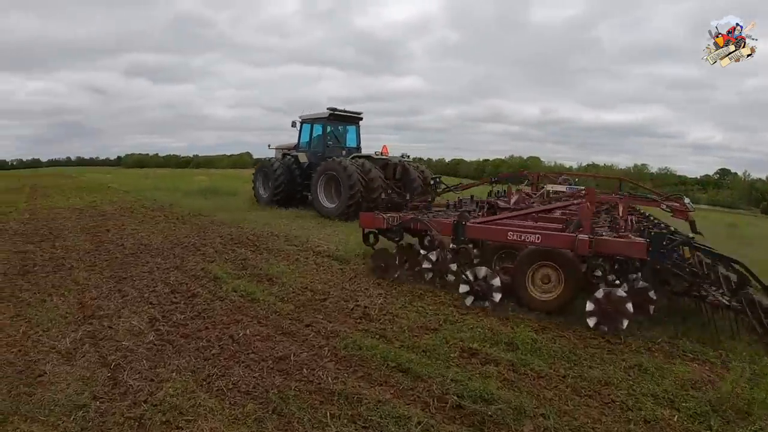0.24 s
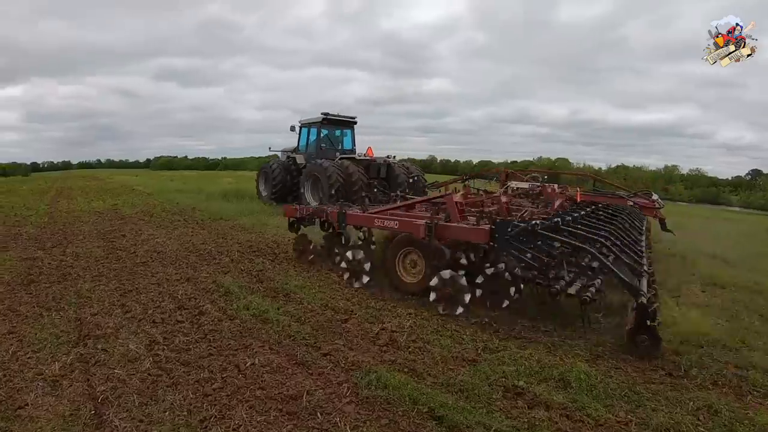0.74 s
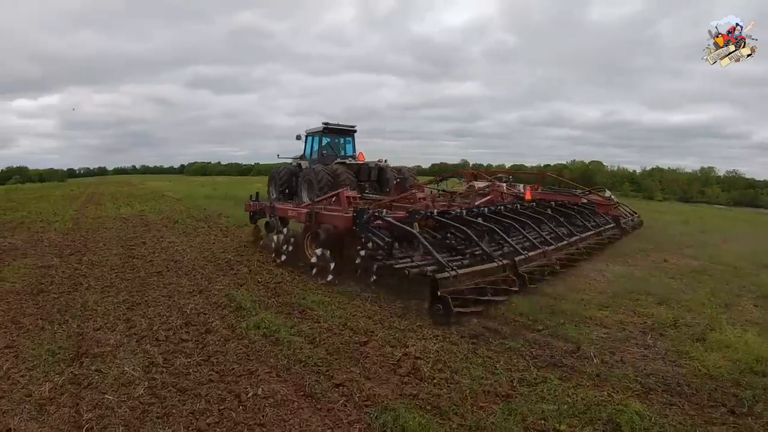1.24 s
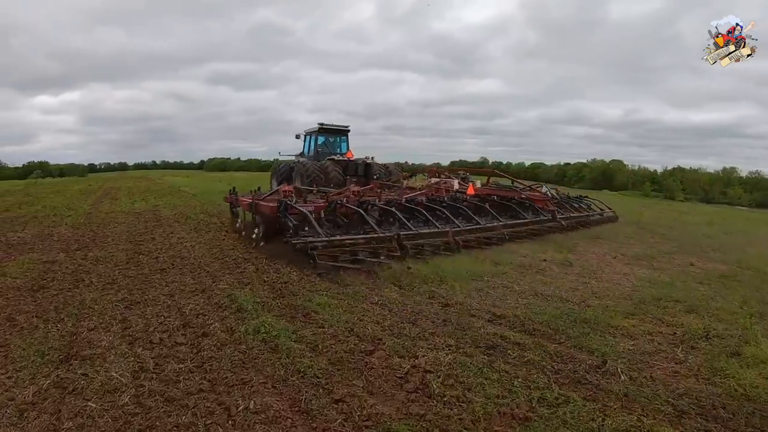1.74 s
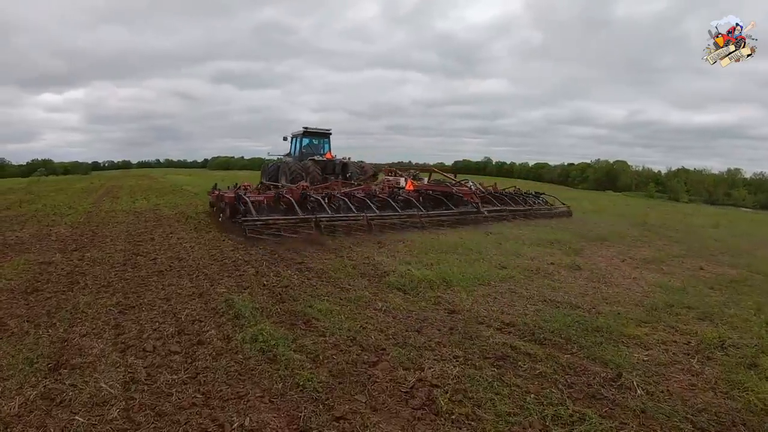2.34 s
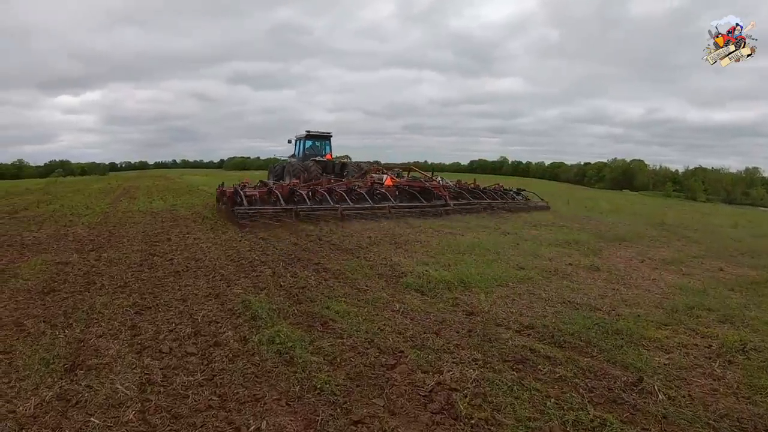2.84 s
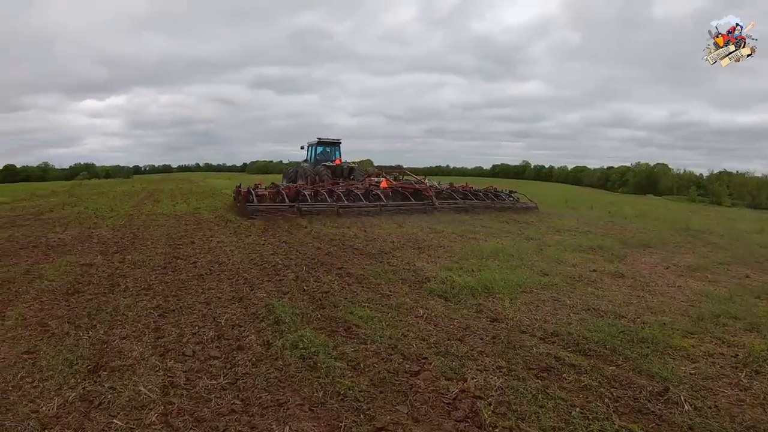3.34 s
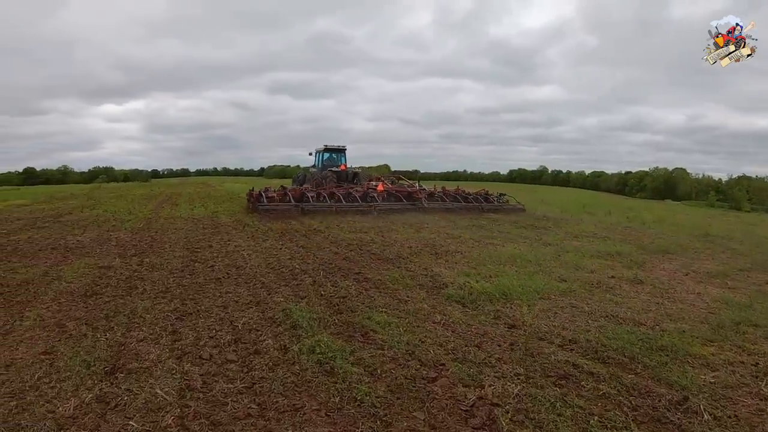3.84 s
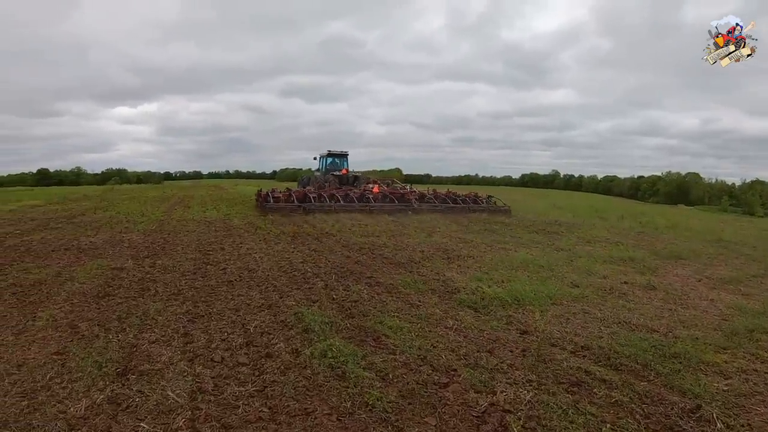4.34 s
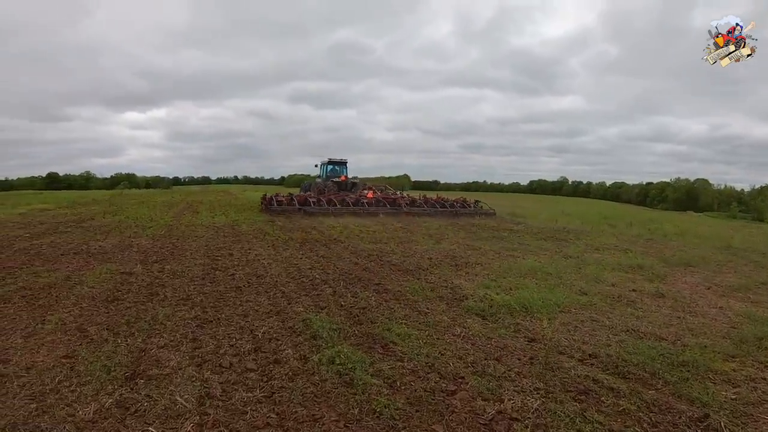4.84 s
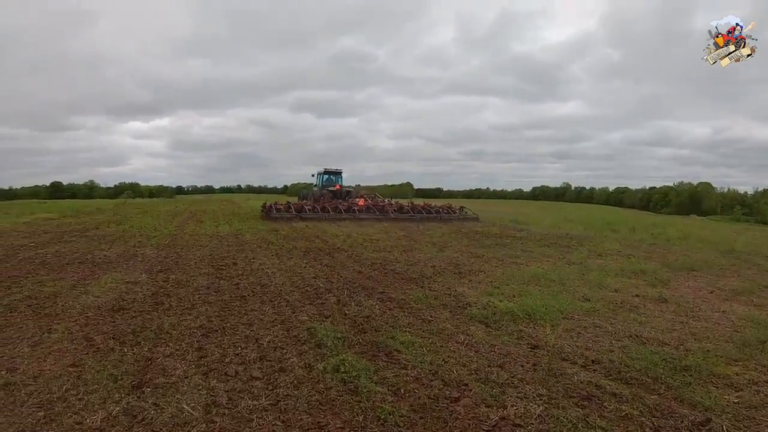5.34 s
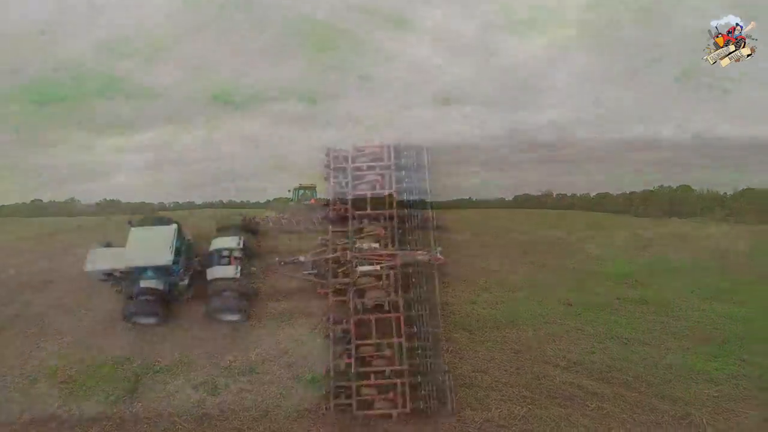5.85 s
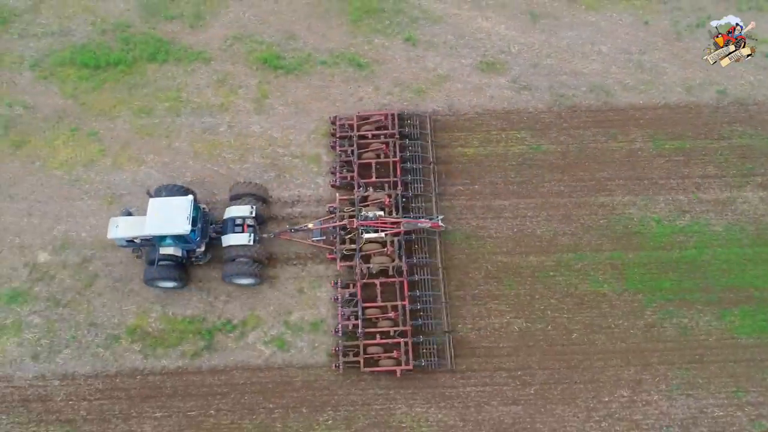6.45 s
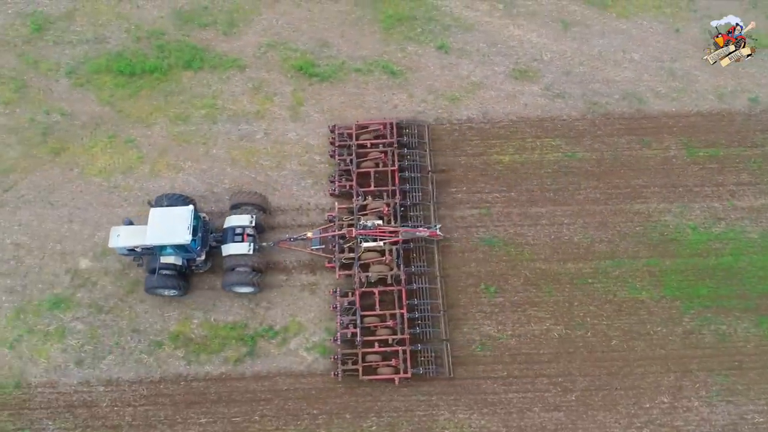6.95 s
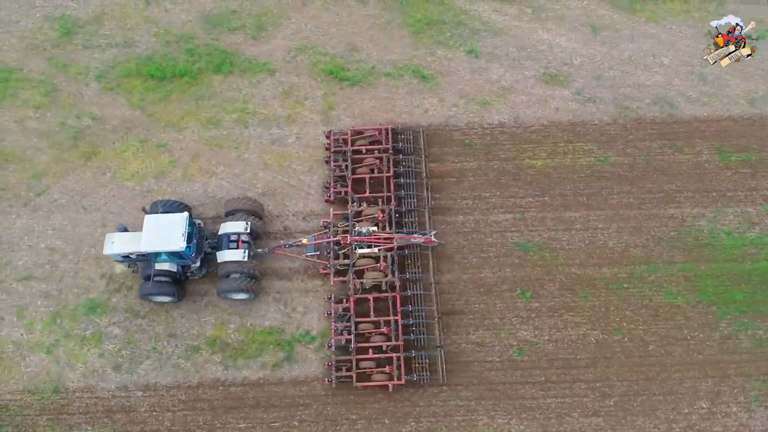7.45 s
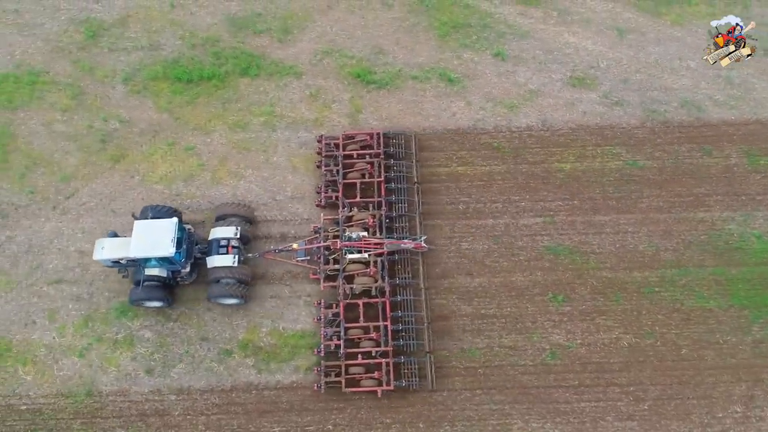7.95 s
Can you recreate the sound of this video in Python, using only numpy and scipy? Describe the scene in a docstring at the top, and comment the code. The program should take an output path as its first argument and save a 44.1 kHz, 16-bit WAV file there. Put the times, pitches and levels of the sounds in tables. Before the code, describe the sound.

A big diesel tractor drags a clanking, rattling steel tillage tool close past and away across a field, then fades into a smoother, quieter distant drone.

```python
"""A six-cylinder diesel tractor close by pulls a wide tillage tool away across a field, revving up as the tool bites.
Its engine is a sum of firing orders, a fan tone and shaped noise; the tool is coloured noise for the soil,
ringing steel modes for clanks and rattles, and short, nearly steady tones for squeaks. A farther, quieter pass
of the tractor fades in, beats against the first and is left alone when that fades.
A close pair of microphones also picks up light wind and one short dry rustle."""
import sys
import numpy as np
from scipy import signal
from scipy.fft import rfft, irfft, next_fast_len
from scipy.io import wavfile
from scipy.ndimage import uniform_filter1d

SR = 44100
rng = np.random.default_rng(int(sys.argv[2]) if len(sys.argv) > 2 else 0)


def magnitude_from_level(level_db):
    """Linear magnitude for a level in decibels (20 dB per decade)."""
    exponent = np.asarray(level_db, float) / 20
    return 10 ** exponent


def waveform_to_disk(signal):
    """Save audio, clipped to [-1, 1], as 16-bit WAV at the path in sys.argv[1]."""
    frames = np.transpose(np.atleast_2d(signal))
    scaled = np.clip(frames, -1, 1) * 32767
    samples = np.round(scaled).astype(np.int16)
    wavfile.write(sys.argv[1], SR, samples)


N = 361619  # length [samples]
HOP = 256  # step between short-time spectra [samples]

# firing rate; the near engine revs up, overshoots and settles under load: (time [s], rate [Hz])
NEAR_FIRING_RATE = [(0, 91.2), (.3, 94.3), (.7, 104), (1.1, 110.4), (1.5, 114.4), (1.9, 113.8),
                    (2.4, 110.7), (3, 109), (3.4, 108.85), (3.9, 107.1), (5.4, 107.1), (6.2, 105.7)]
FAR_FIRING_RATE = [(2.8999, 100.43), (3.6, 98.32), (4.3, 98.95), (5, 100.37), (5.7, 99.87), (6.6, 100.78),
                   (7.6, 99.87), (8.2, 100.75)]
# exhaust note at the firing rate; the near one dips deeply once as the ground echo cancels it:
# (time [s], level [dB rms])
NEAR_NOTE = [(0, -20), (.45, -16), (.65, -21.5), (1.1, -22), (1.4, -26), (1.6, -31.5), (1.85, -23),
             (2.5, -20.5), (3.7, -21.5), (5.2, -20)]
FAR_NOTE = [(3.3, -21.5), (5.7, -23), (6.05, -24), (8.2, -24.5)]
# other exhaust orders: {order [sixths of the firing rate]: level [dB re the common order level]}
NEAR_ORDERS = {3: -18, 4: -13.5, 5: -8.5, 7: -4.5, 8: -10.5, 9: -7, 10: -6, 11: -3, 12: -9, 14: -14, 16:
               -10.5, 18: -10, 20: -17.5, 22: -15.5, 24: -18.5, 26: -12, 27: -13, 30: -16.5, 32: -16.5}
FAR_ORDERS = {3: -14.5, 8: -15.5, 9: -20.5, 10: -11, 11: -10, 12: -5.5, 18: -17.5, 25: -31}
FAN_RATIO = 2.26  # fan tone over firing rate
NEAR_FAN_DB, FAR_FAN_DB = -36, -37.5
NEAR_ROAR_DB, NEAR_ORDERS_DB = -23.5, -30  # engine noise and common order level while close
GONE_DB = -2  # change of both once the tractor has drawn away

# modes of the steel frame and tines: (frequency [Hz], level [dB], decay [share of the t60])
STEEL_MODES = [(1077, -1.5, 0.76), (1248, -4, 1.2), (1617, 2.5, 0.76), (1972, 4, 0.39), (2268, 2, 0.96),
               (2514, 1, 0.96), (2795, -1.5, 1.4), (3214, 2.5, 0.72), (3488, 0, 0.87), (3853, 2.5, 0.64),
               (4408, -1, 0.74), (4830, -11.5, 1.5), (5710, -5.5, 0.75), (6470, -5, 0.5), (7500, -13, 1.2),
               (8920, -12.5, 0.51)]
# blows in the tool: (time [s], peak [dB], brightness [dB per octave], length of the cluster [t60 in s])
CLANKS = [(0.064, -19, -4, 0.17), (0.09, -15.5, -8, 0.13), (0.128, -25, 17, 0.12), (0.197, -20.5, 3, 0.15),
          (0.2514, -23, 7, 0.088), (0.4467, -18, -11, 0.12), (0.47, -17.5, -2.5, 0.074),
          (0.5584, -20, -4, 0.11), (0.577, -11, 1, 0.08), (0.689, -17, -4, 0.29), (0.7936, -16, 9, 0.045),
          (0.837, -15.5, -8, 0.21), (0.8866, -16, -1, 0.21), (1.1358, -12.5, -5, 0.27),
          (1.1987, -16.5, -4, 0.1), (1.2989, -13, 0, 0.2), (1.36, -17, -6, 0.14), (1.5183, -17.5, -2, 0.15),
          (1.5516, -21, 2, 0.2), (1.6001, -18, -3, 0.2), (1.8497, -14, 3.5, 0.67),
          (1.9618, -17.5, -4, 0.13), (2.0022, -14.5, 2, 0.13), (2.1188, -16, -1, 0.15),
          (2.4742, -15, 2.5, 0.3), (2.5582, -8, -2, 0.12), (3.3083, -19.5, -4, 0.24),
          (3.4595, -16, -3, 0.26), (3.988, -17, -2, 0.12), (4.2418, -18.5, -2, 0.19),
          (4.6897, -18.5, -6.5, 0.11), (4.8412, -18.5, -11, 0.1)]
RATTLES_PER_S = 280  # rate of small blows before they clump
RATTLE_DB = -6  # re the tool's base level
CRACK_DB = -20  # crack of a blow, re the peak of its ringing, before brightness
# steel slipping on steel: (time [s], length [s], frequency [Hz], level before fading [dB rms], overtone [dB])
SQUEAKS = [(0.275, 0.028, 5755, -20.5, -11), (.3, 0.048, 6735, -19.5, -32), (0.34, 0.047, 6800, -39, -30),
           (0.392, 0.032, 1505, -24.5, -5), (0.444, 0.039, 2190, -28, -20), (0.736, .23, 12000, -49, -40),
           (1.566, .03, 6900, -39, -30), (1.596, 0.024, 6400, -35.5, -30), (1.645, 0.024, 6040, -44, -30)]
FLUTTER_DB_PER_S = 30  # long slips are rougher

# base level of the near tool; soil and rattle are offset from it: (time [s], level [dB])
NEAR_TOOL = [(0, -32), (.8, -29.5), (1.2, -32), (1.55, -27.5), (2.4, -26.5), (2.9, -30.5), (3.45, -29),
             (4.6, -30), (5.5, -30.5)]
# far pass: (time [s], soil [dB], engine roar and common order level [dB], change of colour [0-1])
FAR_PASS = [(5.9, -41, -33.5, 0), (6.4, -42, -33.5, 0.1), (7.2, -39, -34, 0.4), (8.2, -39.5, -35, 1)]
# where the near pass is: (time [s], bearing as left over right [dB], distance [0-1])
PLACE = [(0, -11, 0.04), (.6, -8.5, 0), (1.2, -4, 0.05), (2.5, 0.5, 0.55), (4, -0.5, 0.89), (5, 0, 0.9),
         (6.2, 3.5, 0.87)]
# crossfade of the passes, straight in amplitude: from, to [s]
FAR_FADE_IN, NEAR_FADE_OUT = (2.92, 3.2), (5.51, 6.264)

# colour of the tool in the soil, close by and drawn away: (frequency [Hz], relative density [dB])
TOOL_CLOSE = [(240, -13), (400, 3.5), (694, -9), (1220, -5.5), (1760, -11.5), (3730, -17.5), (4620, -24),
              (6080, -24), (8920, -34), (11000, -33), (15500, -44)]
TOOL_GONE = [(240, -43), (400, -9), (543, -2), (846, -7), (1180, -4.5), (1660, -13), (1820, -2.5),
             (2360, -8), (2830, 2.5), (3060, -4.5), (3400, -4.5), (5060, -16), (9050, -27.5),
             (11000, -33.5), (15500, -49)]
# colour of the far tool, at first and later, as the ground echo shifts: (frequency [Hz], relative density [dB])
TOOL_FAR = [(190, -48), (330, 0), (366, -20), (528, -12), (718, -3.5), (895, -15.5), (1170, -6.5),
            (1540, -4), (1710, -7), (2540, -15), (2850, -11), (3400, -11), (3660, -13), (11000, -53.5),
            (14300, -93), (22000, -120)]
TOOL_FAR_LATER = [(190, -40), (330, 3), (417, -2.5), (762, -15.5), (1040, -2.5), (1410, -9.5), (1520, -5),
                  (1630, -10), (1840, -8), (2290, -13), (3550, -12), (4560, -22.5), (8960, -34.5),
                  (11000, -42), (14300, -77), (22000, -120)]
# colour of the engine roar, near and far: (frequency [Hz], relative density [dB])
ROAR_NEAR = [(20, -30), (45, -10), (90, 1), (150, 3.5), (220, -0.5), (290, -13), (450, -17), (700, -19.5),
             (1200, -65.5)]
ROAR_FAR = [(20, -22), (45, 3.5), (90, 5), (150, 5.5), (220, 8), (280, -9), (400, -13.5), (700, -57)]
# colour of the wind and of the dry rustle at the microphones: (frequency [Hz], relative density [dB])
WIND = [(15, -10.5), (40, -0.5), (110, 0), (250, -16), (500, -32.5), (1000, -45)]
RUSTLE = [(300, -26), (1200, 1.5), (3000, -9), (5000, -10), (7500, -9), (10000, -10), (14000, -16),
          (16000, -17)]
WIND_DB, WIND_FAR_DB = -38, -47  # with the near pass, with the far pass alone
RUSTLE_DB = -44  # at full swell
RUSTLE_S, RUSTLE_RISE_S, RUSTLE_HOLD_S, RUSTLE_STOP_S = 5.82, 0.07, 0.14, 0.02

# scattered sound that differs between the microphones: (frequency [Hz], level [dB re direct])
APART = [(60, -10.5), (200, -29.5), (380, -29), (700, -11), (1290, -11.5), (2380, -15.5), (4400, -26),
         (6000, -8.5), (8120, 4), (11000, 1), (15000, 2)]
# extra scatter when the wide tool is close: (frequency [Hz], increase [dB])
WIDE = [(200, 0), (500, 5), (1300, 11), (2400, 7.5), (4400, 13), (7000, 6), (12000, 3.5)]
# shading by the microphone housing: (frequency [Hz], share of the bearing [0-1])
SHADOW = [(200, 0.11), (500, 0.15), (800, 0.87), (1300, 0.73), (2400, 0.64), (4400, 0.16), (8000, 0.077)]
# loss of the top treble in the whole mix: (frequency [Hz], gain [dB])
TREBLE_LOSS = [(8000, -0.5), (10200, -4), (11000, -14.5), (14000, -14.5), (15300, -22.5), (15700, -68.5)]


def engine(rate, note, orders, orders_db, fan_db, waver_db, wander, dull_db):
    """A clean note at the firing rate; unequal cylinders add rough lower and higher orders; the fan hums."""
    t = np.arange(N) / SR
    slow = t[::HOP]
    hz = over_time(rate, t)[0] * (t >= rate[0][0])
    turns = 2 * np.pi * np.cumsum(hz) / SR
    out = magnitude_from_level(over_time(note, t)[0]) * np.cos(turns)
    fan_waver = np.interp(t, slow, drift(6.7, slow))
    out += magnitude_from_level(fan_db + 2.1 * fan_waver) * np.cos(FAN_RATIO * turns)
    for sixths, db in orders.items():
        waver, slip = (np.interp(t, slow, drift(4, slow)) for _ in range(2))
        far_db = dull_db * np.clip(sixths / 6 - 2, 0, 1)  # the upper orders sink with distance
        level = magnitude_from_level(orders_db + db + far_db + waver_db * waver)
        steadiness = min(12 / sixths, 1) ** 2  # upper orders hold steadier
        out += level * np.cos(sixths / 6 * turns + wander * slip * steadiness)
    return np.sqrt(2) * out


def ring(tilt_db, t60, detune):
    """One blow: the steel modes, each a little off in pitch and strength, over a short crack."""
    t = np.arange(SR // 16) / SR
    hz, db, share = np.transpose(STEEL_MODES)[:, :, None]
    off, strength = rng.standard_normal((2, len(STEEL_MODES), 1))
    decay_db = -60 * t / (share * max(t60, .01))
    gain = magnitude_from_level(db + 4.7 * strength + tilt_db * np.log2(hz / 2000) + decay_db)
    modes = (gain * np.sin(2 * np.pi * hz * (1 + detune * off) * t)).sum(0)
    modes *= np.minimum(t / 0.0013, 1)  # soft onset [s]
    crack = signal.lfilter([1, -1], [1, -.6], rng.standard_normal(len(t)))
    crack *= magnitude_from_level(CRACK_DB - 60 * t / 0.024)
    blow = modes / abs(modes).max() + crack * magnitude_from_level(tilt_db)
    return blow / abs(blow).max()


def clanks():
    """The loud blows: many loose parts knock together in a dense cluster that thins out."""
    out, t = np.zeros(N + 12000), np.arange(6000) / SR
    for s, db, tilt_db, t60 in CLANKS:
        hits = rng.random((6, len(t))) < .012
        knocks = rng.standard_normal((6, len(t))) * hits * magnitude_from_level(-60 * t / max(t60, .02))
        knocks[range(6), rng.integers(0, 130, 6)] = 1.33  # the first impacts, within 3 ms, are firm
        cluster = sum(signal.fftconvolve(k, ring(tilt_db, 0.076, 0.0527)) for k in knocks)
        out[round(s * SR):][:len(cluster)] += magnitude_from_level(db) * cluster / abs(cluster).max()
    return out[:N]


def rattle(level_db):
    """Many small blows in loose clumps, as the tines jolt over clods."""
    t = np.arange(N) / SR
    clumps = magnitude_from_level(4 * np.interp(t, t[::HOP], drift(12, t[::HOP])))
    chance, part, size = rng.random((3, N))
    strength = magnitude_from_level(-3.5 * np.log(size + 0.034))  # few strong, many weak
    blows = (chance < RATTLES_PER_S * clumps / SR) * strength
    kinds = 16  # differently ringing parts
    out = np.zeros(N)
    for kind in range(kinds):
        own_blows = blows * (np.floor(part * kinds) == kind)
        out += signal.oaconvolve(own_blows, ring(0, 0.056, 0.0492))[:N]
    return magnitude_from_level(level_db + RATTLE_DB) * evened(out)


def squeaks():
    """Steel slips on steel: short, nearly steady tones with one overtone."""
    out = np.zeros(N)
    for s, length, hz, db, over_db in SQUEAKS:
        t = np.arange(round(length * SR)) / SR
        turns = 2 * np.pi * np.cumsum(hz * (1 + 0.003 * drift(100, t))) / SR
        flutter_db = FLUTTER_DB_PER_S * length * drift(186, t)
        grip = magnitude_from_level(-4 * t / length + flutter_db)  # the grip flutters and lets go
        tone = np.cos(turns) + magnitude_from_level(over_db) * np.cos(2 * turns)
        fades = signal.windows.tukey(len(t), .4)
        out[round(s * SR):][:len(t)] += np.sqrt(2) * magnitude_from_level(db) * grip * tone * fades
    return out


def near_pass():
    """The tractor close by: the colour of the tool changes and the rumble sinks as it draws away."""
    t, hz = frame_grid()
    gone = np.clip(over_time(PLACE, t)[1], 0, 1)
    colour_db = (1 - gone) * over_hz(TOOL_CLOSE, hz) + gone * over_hz(TOOL_GONE, hz)
    soil = hiss(colour_db, over_time(NEAR_TOOL, t)[0] + 3.34, (700, 5000), 1.31, 0.61, 14)
    roar_db = NEAR_ROAR_DB + GONE_DB * gone
    roar = hiss(over_hz(ROAR_NEAR, hz), roar_db, (130, 600), 0.69, 0.62, 18)
    t = np.arange(N) / SR
    gone = over_time(PLACE, t)[1]
    orders_db = NEAR_ORDERS_DB + GONE_DB * gone
    motor = engine(NEAR_FIRING_RATE, NEAR_NOTE, NEAR_ORDERS, orders_db, NEAR_FAN_DB,
                   waver_db=3.3, wander=1.63, dull_db=-7 * gone)
    steel = rattle(over_time(NEAR_TOOL, t)[0]) + clanks() + squeaks()
    return (1 - ramp(NEAR_FADE_OUT, t)) * (soil + roar + motor + steel)


def far_pass():
    """The same machine farther off: smooth, with no single blows; one tool colour blends into another."""
    t, hz = frame_grid()
    tool_db, roar_db, later = over_time(FAR_PASS, t)
    later = np.clip(later, 0, 1)
    colour_db = (1 - later) * over_hz(TOOL_FAR, hz) + later * over_hz(TOOL_FAR_LATER, hz)
    soil = hiss(colour_db, tool_db, (700, 5000), 2, .4, 9, size=(5, 60))
    roar = hiss(over_hz(ROAR_FAR, hz), roar_db, (130, 600), 1.5, 0.27, 6)
    t = np.arange(N) / SR
    motor = engine(FAR_FIRING_RATE, FAR_NOTE, FAR_ORDERS, over_time(FAR_PASS, t)[1], FAR_FAN_DB,
                   waver_db=1.4, wander=0.93, dull_db=0)
    return ramp(FAR_FADE_IN, t) * (soil + roar + motor)


def rustle():
    """A dry rustle close by, unrelated at the two microphones, swells and stops short."""
    _, hz = frame_grid()
    pair = np.array([hiss(over_hz(RUSTLE, hz), RUSTLE_DB, (5000, 15000), 6, 1.3, 35) for _ in "LR"])
    t = np.arange(N) / SR - RUSTLE_S
    stop_s = RUSTLE_RISE_S + RUSTLE_HOLD_S
    rise = ramp((0, RUSTLE_RISE_S), t) ** 2
    return pair * rise * (1 - ramp((stop_s, stop_s + RUSTLE_STOP_S), t))


def wind():
    """Low lumps of wind noise, unrelated at the two microphones."""
    t, hz = frame_grid()
    wind_db = WIND_DB + (WIND_FAR_DB - WIND_DB) * ramp(NEAR_FADE_OUT, t)
    return np.array([hiss(over_hz(WIND, hz), wind_db, (15, 400), 4.6, 6.4, 11) for _ in "LR"])


def hiss(shape_db, level_db, band_hz, patchy_db, flicker_db, flicker_hz, size=(9, 10)):
    """Noise of a changing colour, its level set within one band, with patches and a shared flicker."""
    t, hz = frame_grid()
    re, im, patch = rng.standard_normal((t.size, hz.size, 3)).T
    patch = uniform_filter1d(patch, size=size[0], axis=0)  # over frequency
    patch = evened(uniform_filter1d(patch, size=size[1], axis=1))  # over time
    shape = magnitude_from_level(shape_db) * np.ones(t.shape)
    inside = (hz > band_hz[0]) & (hz < band_hz[1])
    shape /= np.sqrt((shape ** 2 * inside).sum(0))
    field = shape * magnitude_from_level(level_db + patchy_db * patch + flicker_db * drift(flicker_hz, t))
    noise = signal.istft((re + 1j * im) * field, nperseg=4 * HOP, noverlap=3 * HOP)[1][:N]
    return noise * np.sqrt(2 / 3)


def microphones(x, bearing_db, gone):
    """The housing shades one microphone in the middle range; scattered sound differs between the two."""
    _, hz = frame_grid()
    z = signal.stft(x, nperseg=4 * HOP, noverlap=3 * HOP)[2]
    frames = z.shape[1]
    lean = magnitude_from_level(over_hz(SHADOW, hz) * bearing_db[:, :frames] / 2)
    apart_db = over_hz(APART, hz) + over_hz(WIDE, hz) * (1 - gone[:, :frames])
    scatter = magnitude_from_level(apart_db) * np.exp(2j * np.pi * rng.random(z.shape))
    pair = np.array([z * lean * (1 + scatter), z / lean * (1 - scatter)])
    return signal.istft(pair, nperseg=4 * HOP, noverlap=3 * HOP)[1][:, :N]


def evened(x):
    """Scales to rms 1."""
    return x / np.sqrt(np.mean(x ** 2) + 1e-20)


def over_hz(points, hz):
    """Reads a spectrum on a log-frequency axis."""
    f, value = np.transpose(points)
    return np.interp(np.log(hz + 1), np.log(f + 1), value)


def over_time(rows, t):
    """Reads every column of a curve at the times t."""
    s, *columns = np.transpose(rows)
    return [np.interp(t, s, c) for c in columns]


def drift(top_hz, t):
    """Random wavering of rms 1: slow sines of random phase, the slower the stronger."""
    rates = np.geomspace(top_hz / 7, top_hz, 20)
    return evened(sum(np.sin(2 * np.pi * (f * t + rng.random())) / np.sqrt(f) for f in rates))


def ramp(span, t):
    """Rises from 0 to 1 over a span of time."""
    return np.clip((t - span[0]) / (span[1] - span[0]), 0, 1)


def frame_grid():
    """Frame times [s] and bin frequencies [Hz] of the short-time spectra."""
    return (np.arange(N // HOP + 5) * HOP / SR)[None], np.fft.rfftfreq(4 * HOP, 1 / SR)[:, None]


def scene():
    """Both passes across the field and the wind and rustle at the microphones."""
    bearing_db, gone = over_time(PLACE, frame_grid()[0])
    near = microphones(near_pass(), bearing_db, np.clip(gone, 0, 1))
    far = microphones(far_pass(), 0 * gone, np.ones(gone.shape))  # straight ahead and distant
    return near + far + rustle() + wind()


def low_pass(x):
    """Removes everything above the highest recorded frequency."""
    return signal.sosfilt(signal.butter(12, 15610, fs=SR, output="sos"), x)


def record(dry):
    """The top treble drops away in steps across the whole mix."""
    size = next_fast_len(N)
    colour = magnitude_from_level(over_hz(TREBLE_LOSS, np.fft.rfftfreq(size, 1 / SR)))
    mix = irfft(rfft(dry, size) * colour, size)[:, :N]
    return low_pass(mix)


dry = scene()
out = record(dry)
waveform_to_disk(out)
```